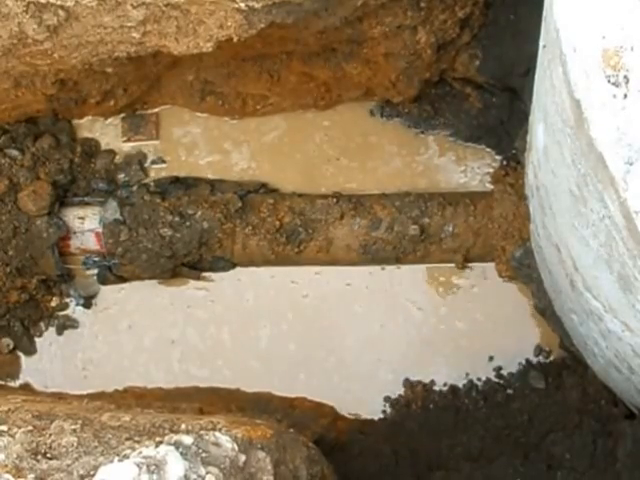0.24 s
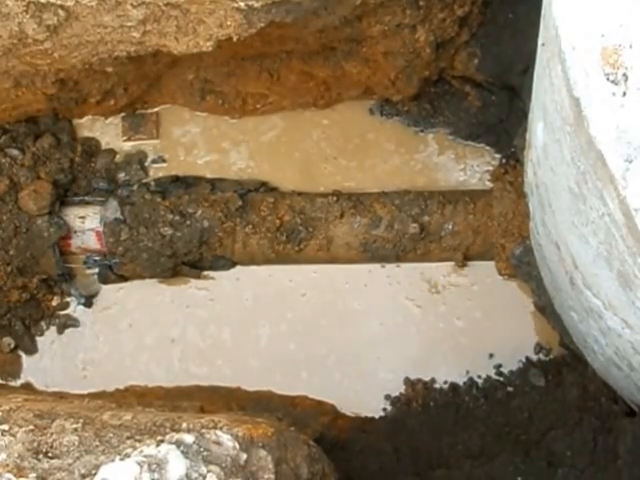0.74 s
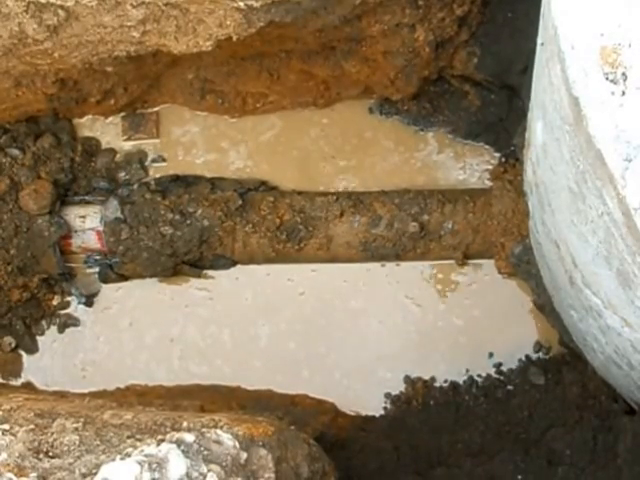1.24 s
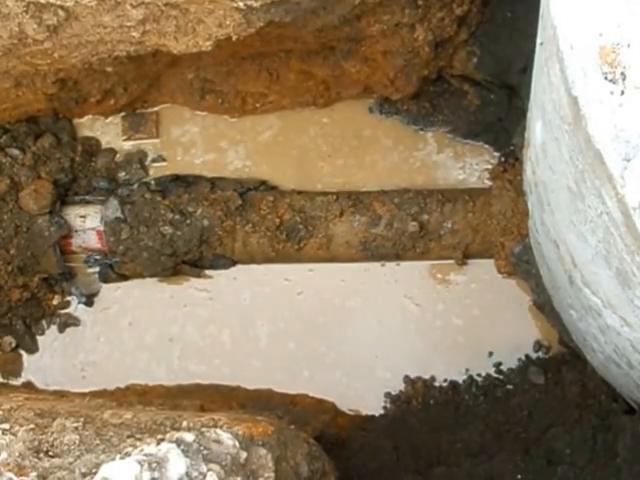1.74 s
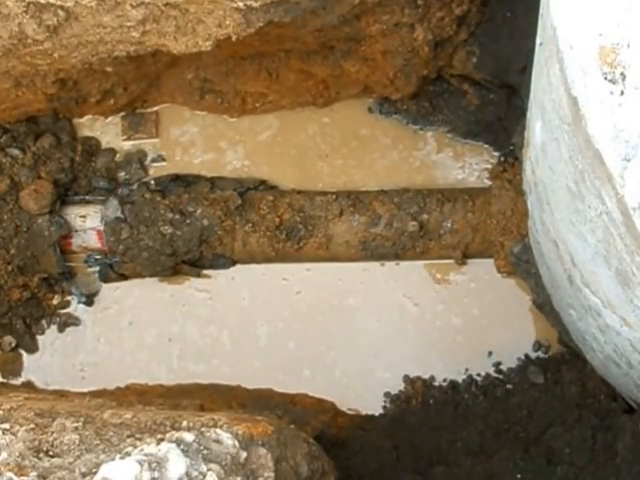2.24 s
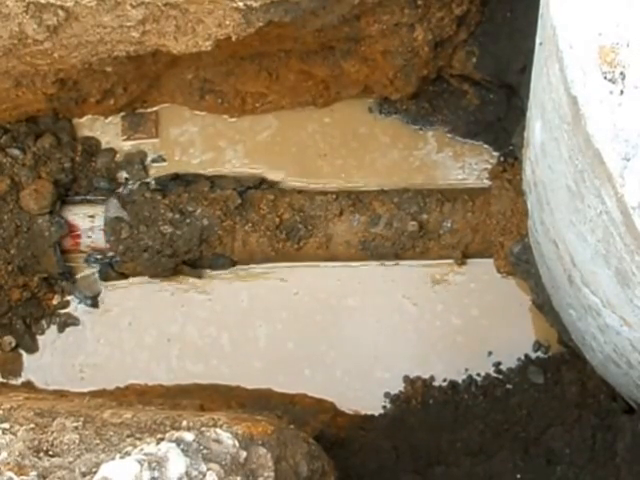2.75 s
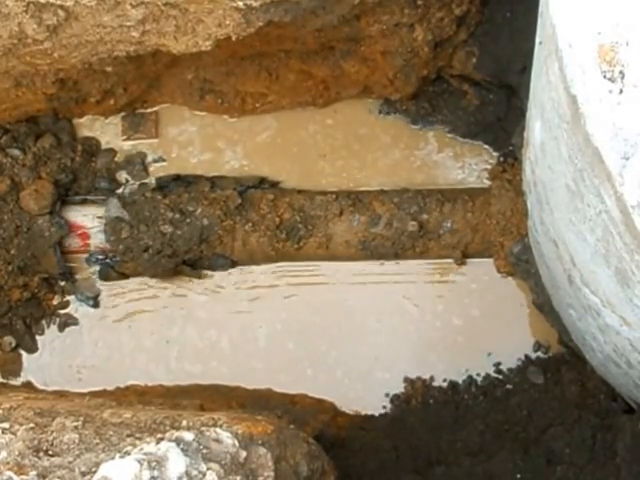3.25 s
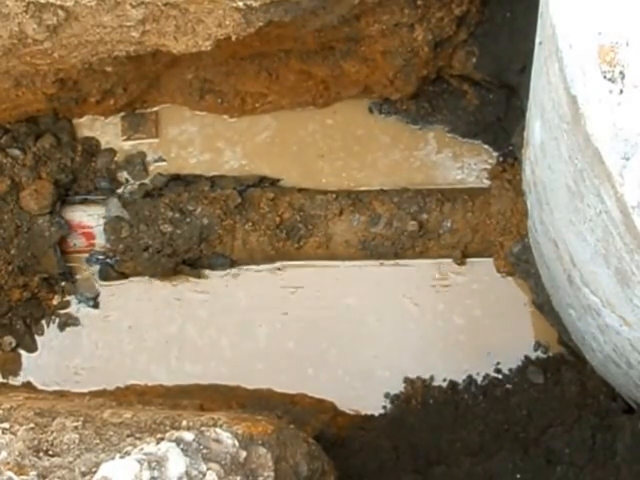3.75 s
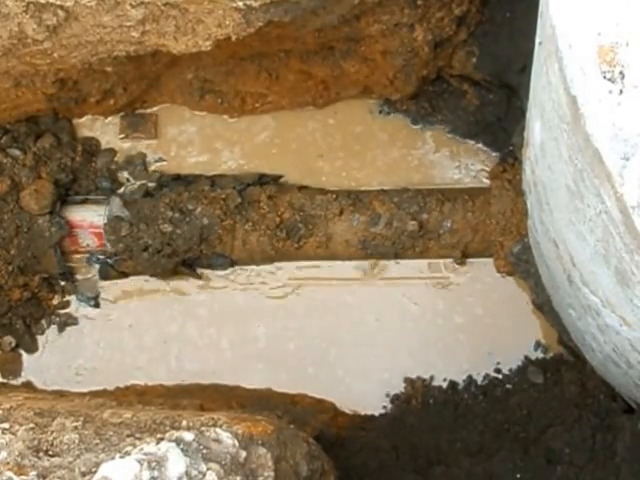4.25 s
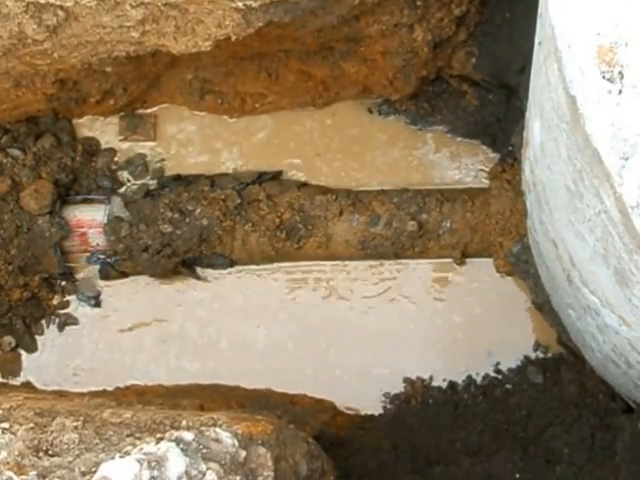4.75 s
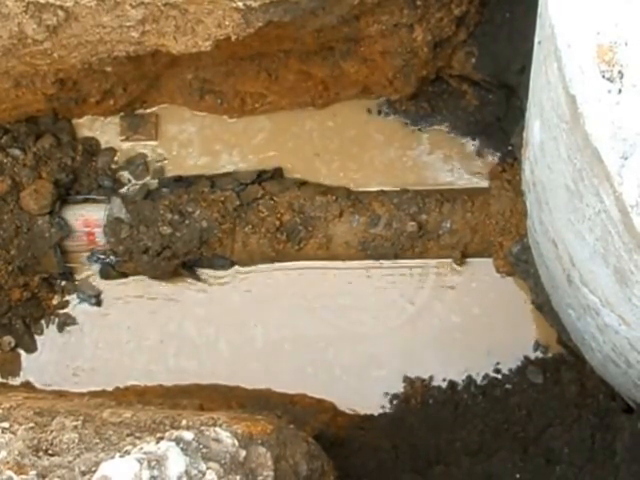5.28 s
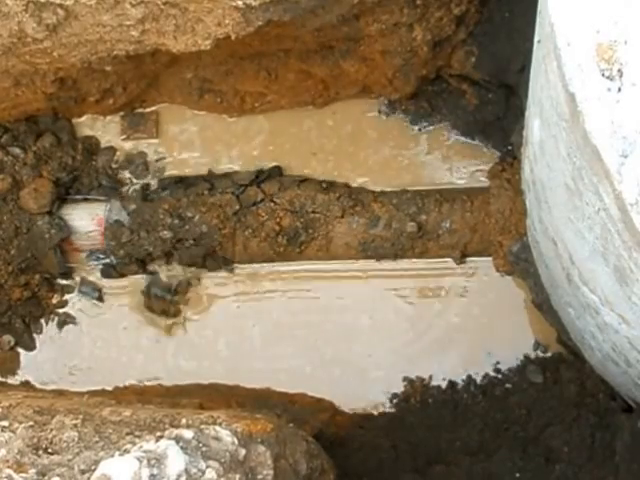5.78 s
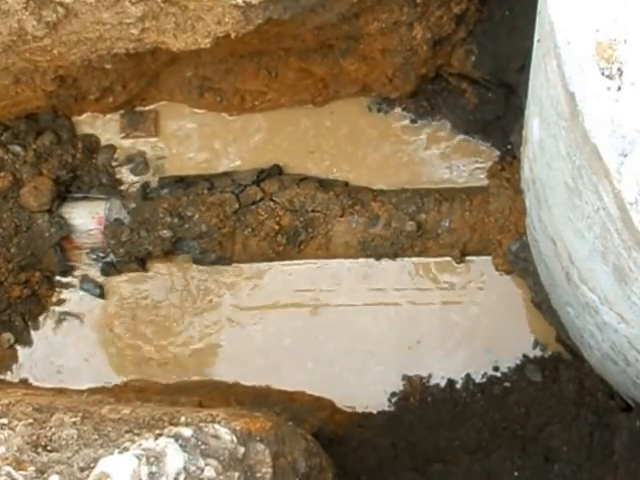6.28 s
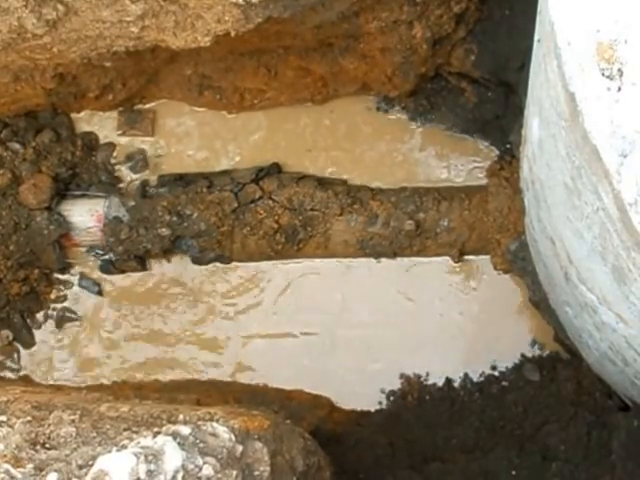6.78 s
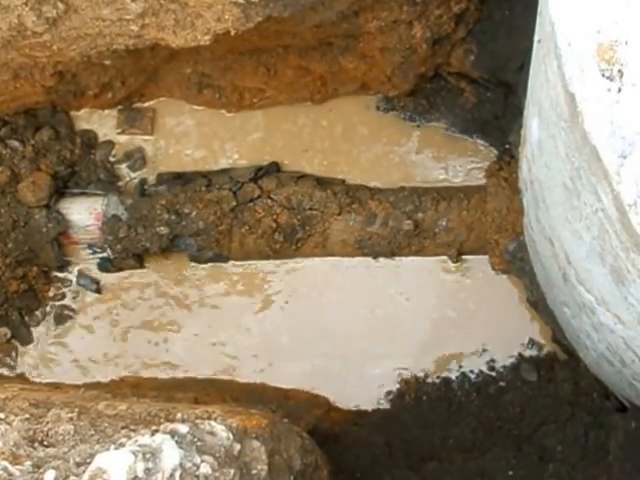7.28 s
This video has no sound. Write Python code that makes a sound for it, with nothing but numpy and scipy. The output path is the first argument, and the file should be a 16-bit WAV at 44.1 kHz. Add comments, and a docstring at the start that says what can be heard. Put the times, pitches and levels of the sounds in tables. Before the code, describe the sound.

A machine engine drones throughout, a low buzzing hum around 95 Hz with fan and pump noise, sagging slightly in pitch under load. In the first 2.3 seconds it is mostly alone, with very faint high squeaks, a brief chirp near 1.0 and tiny cracks near 1.2 and 1.7. A dull thud at 2.3 leads to a violent snap at 2.7. Gritty crunching surges follow from 2.9 to 3.6, with flakes ticking, then hard cracks at 4.0 and 4.55, smaller ones to 5.4, and a dense cluster from 5.5 to 5.9 with heavy soil thuds. Crumbling fades by 6.1 as wet spatter and drips begin. Clods plop deeply into muddy water near 6.5 and again around 7.2, over the continuing engine. Close, slightly dull outdoor pickup in a tight trench; the level dips after loud cracks and recovers gradually.

```python
"""In a wet trench a bursting head is pulled through a buried concrete pipe while a rig's engine drones nearby.
The engine is a sum of firing orders plus pulsing noise; thin squeaks are narrow-band noise.
The wall crunches as surges of filtered grains, and breaks as decaying avalanches that thud into the soil.
Clods then drop into muddy water: bursts of spatter and damped air pockets of rising pitch.
The recorder's gain control ducks after loud cracks."""
import sys
import numpy as np
from scipy import signal
from scipy.fft import rfft, irfft, next_fast_len
from scipy.io import wavfile
from scipy.ndimage import uniform_filter1d, map_coordinates

SR = 44100
rng = np.random.default_rng(int(sys.argv[2]) if len(sys.argv) > 2 else 0)


def inscribe(sig):
    """Save sig as 16-bit PCM at rate SR to the path in sys.argv[1].

    A 1-D sig is mono; a 2-D sig holds one channel per row.
    Samples are clipped to [-1, 1] before scaling.
    """
    pcm = np.round(np.clip(np.atleast_2d(sig).T, -1, 1) * 32767)
    wavfile.write(sys.argv[1], SR, pcm.astype(np.int16))


N = 331660
TIME = np.arange(N) / SR
TOP_HZ = 8050  # upper edge of the audible band

# Steady grinding of the strained wall. Each row: time in seconds, relative grit level in dB.
STRAIN_LEVEL = [(2.5, -49), (2.65, -41.5), (3.0, -39.5), (3.9, -41), (4.5, -39), (4.7, -41), (5.301, -44),
                (5.699, -33), (6.3, -42), (6.6, -46.5)]
# Spectrum of shifting earth. Each row: frequency in Hz, relative density in dB per Hz.
SOIL_SPECTRUM = [(30, -34), (90, -18), (150, -10.5), (250, 3), (400, -2.5), (650, -9.5), (1300, -28.5),
                 (4000, -51.5)]


def amp(db):
    """Logarithmic level law: decibels to amplitude gain."""
    return 10 ** (np.asarray(db) / 20)


def unit(x):
    """Power normalisation: scale to rms 1."""
    return x / np.sqrt(np.mean(x ** 2) + 1e-20)


def along(points, hz):
    """Log-frequency interpolation of (Hz, value) points."""
    f, v = np.transpose(points)
    return np.interp(np.log(hz + 1), np.log(f), v)


def curves(rows):
    """Linear interpolation in time: one curve for each column after the time."""
    s, *columns = np.transpose(rows)
    return [np.interp(TIME, s, column) for column in columns]


def wobble(rate):
    """Band-limited random modulation: a smooth curve through rate random knots a second."""
    knots = rng.standard_normal(int(N * rate / SR) + 4)
    return map_coordinates(knots, [TIME * rate])


def filtered(x, response):
    """Zero-phase filtering: multiply the spectrum by a response of frequency."""
    m = next_fast_len(N + SR // 2)
    return irfft(rfft(x, m) * response(np.fft.rfftfreq(m, 1 / SR)), m)[:N]


def body(x, gain, size=4096):
    """Minimum-phase filtering: a causal impulse response of unit energy, shaped by gain of frequency."""
    cepstrum = irfft(np.log(gain(np.fft.rfftfreq(size, 1 / SR)) + 1e-6))
    # folding the cepstrum onto positive times makes the response causal
    cepstrum[1:size // 2] *= 2
    cepstrum[size // 2 + 1:] = 0
    impulse = irfft(np.exp(rfft(cepstrum)))
    return signal.fftconvolve(x, impulse / np.linalg.norm(impulse))[:N]


def add(track, s, sound):
    """Superposition: mix a sound into the track at time s in seconds."""
    part = track[round(s * SR):][:len(sound)]
    part += sound[:len(part)]


def grains(rate, spread_db):
    """Shot noise: on average rate random impulses a second, of uneven size, overall rms 1."""
    sizes = amp(spread_db * np.clip(rng.standard_normal(N), -2, 2))
    signs = rng.choice([-1, 1], N)
    return unit(sizes * signs * (rng.random(N) < rate / SR))


def swell(s, spread):
    """Gaussian envelope: a bell around time s with a standard deviation in seconds."""
    return np.exp(-.5 * ((TIME - s) / spread) ** 2)


def ring(hz, t60, attack, glide=0):
    """Damped mode: a sinusoid decaying 60 dB in t60; its pitch rises by twice the share glide each second."""
    t = np.arange(SR // 5) / SR
    envelope = amp(-60 * t / t60) * (1 - np.exp(-t / attack))
    return envelope * np.sin(2 * np.pi * hz * t * (1 + glide * t))


def patchy(x, depth_db, size=256):
    """Random spectral modulation: passing fragments differ in size, so the colour keeps shifting."""
    z = signal.stft(x, nperseg=size)[2]
    field = uniform_filter1d(rng.standard_normal(z.shape), 3, axis=0)
    field = uniform_filter1d(field, 5, axis=1)
    return signal.istft(z * amp(depth_db * unit(field)), nperseg=size)[1][:N]


def sag():
    """Speed droop: Hz by which hydraulic load drags the firing rate below its governed value."""
    # Spells of load. Each row: start in seconds, end in seconds (midpoints of the slopes), sag in Hz.
    loads = [(-.5, .45, 3.04), (1.86, 2.41, 4.07), (2.5, 5.544, 0.96), (6.079, 6.421, 6.6), (7.199, 8, 4.8)]
    slow_s, recover_s = 0.121, 0.07  # time scales of the two slopes
    total = np.zeros(N)
    for start, end, hz in loads:
        loaded = (1 + np.tanh((TIME - start) / slow_s)) / 2
        unreleased = (1 - np.tanh((TIME - end) / recover_s)) / 2
        total += hz * loaded * unreleased
    return total


def engine(governed_hz=50.9, noise_db=-39.0, labour_db_per_hz=0.36, flutter_db=1.77, blur=0.58, beat=0.1):
    """Source and filter: firing orders slide over silencer resonances; noise pulses at twice the firing rate."""
    # What the silencer passes of each order. Each row: frequency in Hz, rms level in dB before flutter and gain.
    silencer = [(50, -62), (87, -45.5), (95, -39.5), (103, -49.5), (138, -44), (153, -53.5), (180, -53.5),
                (191, -43), (203, -37), (235, -54), (300, -51), (400, -55), (490, -49.5), (560, -55),
                (750, -61)]
    # Spectrum of fan and pump noise. Each row: frequency in Hz, relative density in dB per Hz.
    machinery = [(25, -30.5), (65, -20), (110, -3.5), (170, -4), (250, -5.5), (480, -7), (680, -13.5),
                 (930, -9.5), (1500, -19.5), (1900, -19), (2550, -23.5), (4600, -29.5), (6200, -29.5),
                 (7900, -31)]
    # Overall gain of the engine. Each row: time in seconds, gain in dB.
    engine_gain = [(0, 0.5), (3.8, -1), (4.4, -3), (5.3, -5), (6.1, -1), (7.5, -1.5)]
    load = sag()
    rate = governed_hz - load
    jitter = 1 + 0.00293 * wobble(25)
    phase = 2 * np.pi * np.cumsum(rate * jitter) / SR
    tone = np.zeros(N)
    for k in range(1, 15):
        wander = blur * (k / 8) ** 2 * wobble(30)  # uneven firings blur the high orders
        level = along(silencer, k * rate) + flutter_db * wobble(16)
        tone += np.sqrt(2) * amp(level) * np.sin(k * phase + rng.uniform(0, 2 * np.pi) + wander)
    clatter = rng.standard_normal(N) * (1 + beat * np.sin(2 * phase)) * amp(.7 * wobble(30))
    clatter = patchy(clatter, depth_db=2.0, size=1024)
    noise = unit(filtered(clatter, lambda hz: amp(along(machinery, hz))))
    # the machinery grows louder as the engine sags
    noise = amp(noise_db + labour_db_per_hz * load) * noise
    gain_db, = curves(engine_gain)
    return amp(gain_db) * (tone + noise)


def squeaks(hz=4600, width_hz=220):
    """Narrow-band noise: thin, high squeaks swell faintly around one resonance."""
    # Each row: centre in seconds, standard deviation in seconds, peak rms level in dB.
    squeak_events = [(.18, 0.098, -55), (0.999, 0.0093, -43.5), (1.58, 0.056, -53.5)]
    hiss = rng.standard_normal(N)
    band = unit(filtered(hiss, lambda f: 1 / (1 + (2 * (f - hz) / width_hz) ** 2)))
    return band * sum(amp(db) * swell(s, spread) for s, spread, db in squeak_events)


def concrete(hz):
    """Resonant radiation: the broad colour of grit is lifted by the modes of the pipe wall."""
    # Spectrum of crumbling concrete. Each row: frequency in Hz, relative density in dB per Hz.
    crumble_spectrum = [(100, -25.5), (350, 0), (750, 7), (1100, 2), (2400, -1.5), (4000, -5), (5200, -1),
                        (7000, -5.5), (8000, -14)]
    # Resonances of the pipe wall. Each row: frequency in Hz, width in Hz, height in dB.
    wall_modes = [(1594, 100, -0.5), (1990, 320, -1.5), (2750, 150, -4), (3354, 460, 0), (4450, 210, -5),
                  (5500, 20, -13), (6290, 25, -17.5)]
    peaks = sum(amp(db) / (1 + (2 * (hz - f) / width) ** 2) for f, width, db in wall_modes)
    return amp(along(crumble_spectrum, hz)) * (1 + peaks) / (1 + (hz / TOP_HZ) ** 20)


def slip(s, attack_s=0.0039, hold_s=0.024, release_s=0.011):
    """Stick-slip envelope: a linear attack from time s, then exponential release once hold_s has passed."""
    t = np.maximum(TIME - s, 0)
    release = np.exp(-np.clip(t - hold_s, 0, 1) / release_s)
    return np.minimum(t / attack_s, 1) * release


def chips(level, count=520, pitch_hz=3800, cycles=14, spread_db=4):
    """Modal ringing: flakes tick off, each at its own pitch, as strongly as the wall is grinding."""
    out = np.zeros(N)
    for s in rng.uniform(STRAIN_LEVEL[0][0], STRAIN_LEVEL[-1][0], count):
        hz = np.clip(pitch_hz * np.exp(.5 * rng.standard_normal()), 1000, 7600)
        size = amp(spread_db * np.clip(rng.standard_normal(), -2, 1.6))
        add(out, s, level[round(s * SR)] * size * ring(hz, cycles / hz, attack=0.00011))
    return out


def grinding(grit_db=-1, chip_db=2, surge_earth_db=1.5):
    """Stick-slip friction: shards rub under strain, in surges that also push the earth aside."""
    # The wall sticks and slips. Each row: start in seconds, relative level of the crunch in dB.
    crunches = [(.99, -46.5), (2.607, -37.5), (2.819, -38), (2.917, -32.5), (2.996, -28), (3.116, -27.5),
                (3.239, -31), (3.315, -33), (3.409, -35.5), (3.501, -34), (3.595, -31.5), (3.866, -31),
                (4.003, -28), (4.05, -26.5), (4.44, -38), (4.502, -28.5), (4.534, -30), (4.584, -31),
                (4.872, -30.5), (5.018, -32.5), (5.076, -38), (5.158, -33.5), (5.255, -38.5), (5.545, -28),
                (5.72, -25.5), (6.005, -40)]
    # envelopes of power
    steady = amp(curves(STRAIN_LEVEL)[0]) ** 2
    surges = sum((amp(db) * slip(s)) ** 2 for s, db in crunches)
    grit = steady + surges
    earth = steady + amp(surge_earth_db) ** 2 * surges
    slips = unit(patchy(grains(rate=3000, spread_db=6.5), depth_db=2.0))
    rubbing = np.sqrt(grit) * slips * amp(1.8 * wobble(150))
    shards = body(rubbing, lambda hz: concrete(hz) * (1 + hz / 9000))
    pushing = np.sqrt(earth) * grains(rate=900, spread_db=0.0)
    soil = body(pushing, lambda hz: amp(along(SOIL_SPECTRUM, hz)))
    return amp(grit_db) * shards + soil + amp(chip_db) * chips(np.sqrt(grit))


def thud_pitch(thud_db, light_hz=326.3, heavy_hz=196.7, middle_db=-9, range_db=2.5):
    """Inertia: the harder the thud, the heavier the piece and the lower its pitch."""
    heavy = (1 + np.tanh((thud_db - middle_db) / range_db)) / 2
    return light_hz + heavy * (heavy_hz - light_hz)


def fractures(snap_db=16, heave_db=-2, rumble_db=-8, rumble_t60=0.13, split_hz=2800):
    """Brittle failure: a snap leads an avalanche of small cracks while the pipe thuds against the soil."""
    # Each row: time in seconds, relative crack level in dB, gain in dB of the treble above split_hz,
    # t60 of the crumbling in seconds, relative thud level in dB.
    cracks = [(1.156, -31, 8.5, 0.017, -65.5), (1.699, -37, 4, .04, -64.5),
              (2.316, -32.5, -22.5, 0.39, -23), (2.676, -14, 1, 0.13, -14), (2.685, -19.5, -1, 0.055, -18),
              (2.7034, -5, 0.5, 0.034, -0.5), (2.741, -20.5, 9.5, 0.045, -14.5),
              (3.149, -18.5, -5, 0.035, -40.5), (3.399, -30, 8, 0.06, -21),
              (3.704, -28.5, 4.5, 0.06, -39.5), (3.729, -19.5, -4, 0.097, -21.5),
              (3.905, -25, 8.5, 0.14, -14), (3.929, -18, -4, 0.12, -18.5), (4.0297, -2.5, 2.5, 0.011, -3),
              (4.039, -14.5, -4.5, 0.14, -11.5), (4.434, -31.5, 12.5, 0.041, -45),
              (4.5663, 1, -5.5, 0.048, -11), (4.810, -13.5, 0, 0.04, -23.5), (4.899, -16, -6, 0.052, -30),
              (4.997, -21, 4, 0.1, -14), (5.375, -14.5, -5, 0.09, -13.5), (5.5182, -8, -6, .13, -4),
              (5.638, -15.5, 1, 0.089, -14.5), (5.71, -16, 2, 0.11, -12.5),
              (5.751, -12.5, -2, 0.037, -28.5), (5.792, -18.5, -12, 0.14, -24), (5.826, -21, -2, .08, -16),
              (5.8409, -4, -5.5, 0.06, -1), (5.872, -22.5, 7.5, 0.088, -12),
              (6.022, -28.5, 13.5, 0.05, -50), (6.1043, -26, 12.5, 0.019, -45)]
    # A broken section heaving in its bed of soil. Each row: multiple of the thud pitch,
    # relative level in dB, t60 in seconds.
    bed_modes = [(.78, -6, 0.12), (1, -2.5, 0.14), (1.249, -7.5, 0.12), (1.65, -0.5, .08),
                 (2.45, -11, 0.069), (3.601, -8, 0.054)]
    # Single shards ringing as they spring free. Each row: time in seconds, pitch in Hz,
    # level in dB, t60 in seconds.
    springing_shards = [(2.743, 6370, -16.5, 0.052), (3.935, 4900, -7, 0.015), (4.012, 4900, -13, 0.015),
                        (4.535, 5100, -41.5, 0.031), (4.996, 5200, -17.5, 0.022),
                        (5.751, 1185, -15.5, 0.069), (5.753, 3500, -16.5, 0.034),
                        (5.754, 1980, -15.5, 0.03)]
    rise_share = 0.0032  # rise time of a 0 dB avalanche as a share of its t60
    suddenness = 0.56  # how much faster a hard crack builds than a weak one, dB per dB
    t = np.arange(SR // 3) / SR
    crumbs, earth, modes = np.zeros((3, N))
    avalanche = unit(patchy(grains(rate=10000, spread_db=0.5), depth_db=3.0))
    for s, db, treble_db, t60, thud_db in cracks:
        rise = rise_share * t60 / amp(suddenness * db)
        growth = 1 - np.exp(-(t + 1 / SR) / rise)
        burst = amp(-60 * t / t60) * avalanche[round(s * SR):][:len(t)]
        burst[0] += amp(snap_db)
        burst *= growth
        dull = signal.lfilter(*signal.butter(1, split_hz, fs=SR), burst)
        treble = burst - dull
        add(crumbs, s, amp(db) * (dull + amp(treble_db) * treble))
        rumble_decay = amp(thud_db + rumble_db - 60 * t / rumble_t60)
        add(earth, s, rumble_decay * (1 - np.exp(-t / 0.003)))
        for multiple, level_db, life in bed_modes:
            # every piece sits differently in the soil, so its modes shift a little
            hz = thud_pitch(thud_db) * multiple * (1 + 0.048 * rng.standard_normal())
            push = amp(thud_db + heave_db + level_db) * rng.choice([-1, 1])
            add(modes, s, push * ring(hz, life, attack=0.0027))
    for s, hz, db, t60 in springing_shards:
        add(modes, s, amp(db) * ring(hz, t60, attack=0.0004))
    rumble = body(earth * rng.standard_normal(N), lambda hz: amp(along(SOIL_SPECTRUM, hz)))
    return body(crumbs, concrete) + modes + rumble


def puddle(drops_db=-40, drop_hz=1500, count=26):
    """Bubble resonance: sloshing water traps air pockets of rising pitch; spray falls back as drips."""
    # Sloshing of the water. Each row: centre in seconds, standard deviation in seconds, relative level in dB.
    splashes = [(6.12, 0.15, -41), (6.437, 0.046, -32), (6.542, 0.03, -28.5), (7.174, 0.025, -36.5),
                (7.249, 0.048, -42.5)]
    # Spectrum of the spatter. Each row: frequency in Hz, relative density in dB per Hz.
    water_spectrum = [(60, -35.5), (250, 1), (600, -1), (1300, -8), (2500, -13), (8000, -19.5)]
    # Air pockets of falling clods. Each row: time in seconds, starting pitch in Hz, level in dB, t60 in seconds.
    plops = [(5.992, 1376, -30.5, .1), (6.048, 1900, -24, 0.037), (6.135, 690, -30, 0.059),
             (6.444, 478, -21, .05), (6.537, 136, -18, 0.08), (6.541, 204, -11.5, 0.076),
             (7.158, 1270, -14, 0.032), (7.175, 1175, -22.5, 0.089), (7.213, 184, -15, 0.079),
             (7.233, 240, -17.5, 0.043)]
    slosh = sum(amp(db) * swell(s, spread) for s, spread, db in splashes)
    spatter = unit(patchy(grains(rate=3500, spread_db=4.5), depth_db=3.5, size=512))
    water = body(slosh * spatter, lambda hz: amp(along(water_spectrum, hz)))
    for s, hz, db, t60 in plops:
        add(water, s, amp(db) * ring(hz, t60, attack=0.0016, glide=0.95))
    for s in rng.uniform(5.95, 6.55, count):
        hz = min(drop_hz * np.exp(.5 * rng.standard_normal()), 5000)
        size = amp(drops_db + 3 * rng.standard_normal())
        add(water, s, size * ring(hz, 40 / hz, attack=.001, glide=2.5))
    return water


def trench(x, t60=0.16):
    """Reverberation: close earth walls answer with a short, dull tail of decaying noise."""
    t = np.arange(SR // 4) / SR
    dull = signal.lfilter(*signal.butter(1, 4000, fs=SR), rng.standard_normal(len(t)))
    tail = dull * amp(-60 * t / t60) * (t > .004)  # silent for the first 4 ms
    echo_gain = amp(-10) / 2
    return x + echo_gain * signal.fftconvolve(x, tail / np.linalg.norm(tail))[:N]


def scene(cut_hz=125):
    """Radiation and superposition: small pieces radiate little deep bass; engine and squeaks stay dry."""
    bass_cut = signal.butter(2, cut_hz, "high", fs=SR, output="sos")
    pipe = signal.sosfilt(bass_cut, fractures() + grinding())
    return (trench(pipe + puddle()) + engine() + squeaks())[None]


def lag(x, seconds):
    """First-order relaxation: one-pole smoothing with a time constant in seconds."""
    keep = np.exp(-1 / (seconds * SR))
    return signal.lfilter([1 - keep], [1, -keep], x)


def record(dry, threshold_db=-26, squeeze=0.4, recovery=8):
    """Level-dependent gain: loud cracks duck it, it recovers in dB a second; peaks clip, the band is narrow."""
    x = dry[0]
    level_db = 10 * np.log10(lag(x ** 2, 0.015) + 1e-12)
    over = squeeze * np.maximum(level_db - threshold_db, 0)
    # the reduction holds its peaks and falls from them at the recovery rate
    duck = np.maximum.accumulate(over + recovery * TIME) - recovery * TIME
    x = np.clip(x * amp(-lag(duck, 0.11)), -1, 1)
    return filtered(x, lambda hz: np.clip((TOP_HZ - hz) / 300 + .5, 0, 1))[None]


dry = scene()
out = record(dry)
inscribe(out)
```